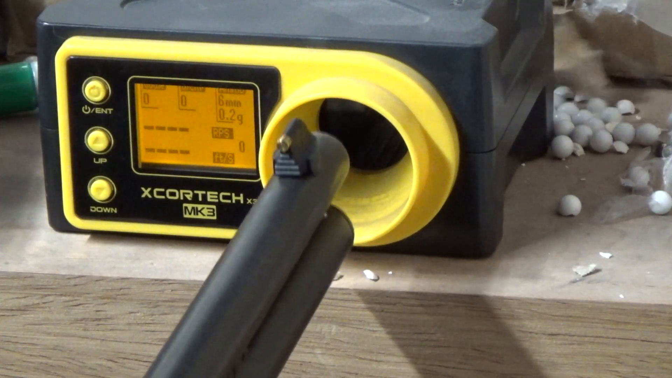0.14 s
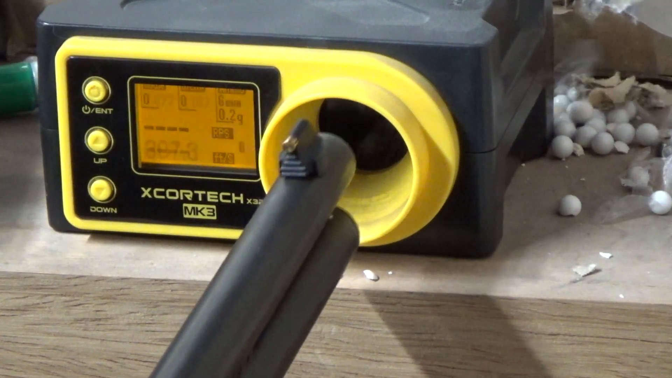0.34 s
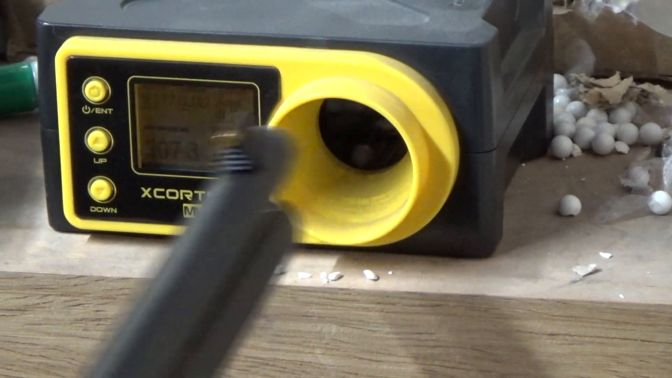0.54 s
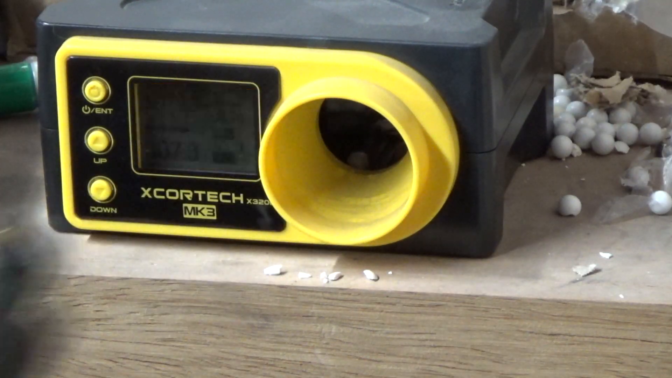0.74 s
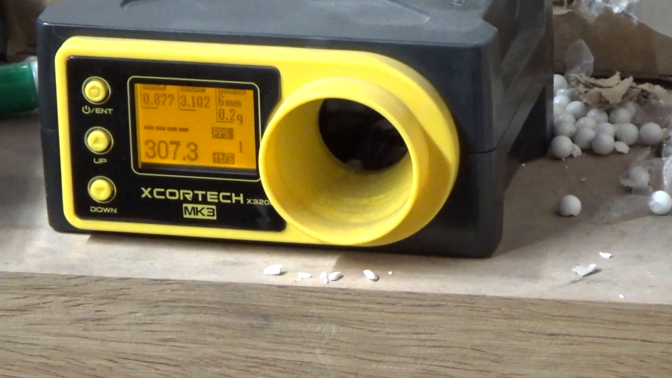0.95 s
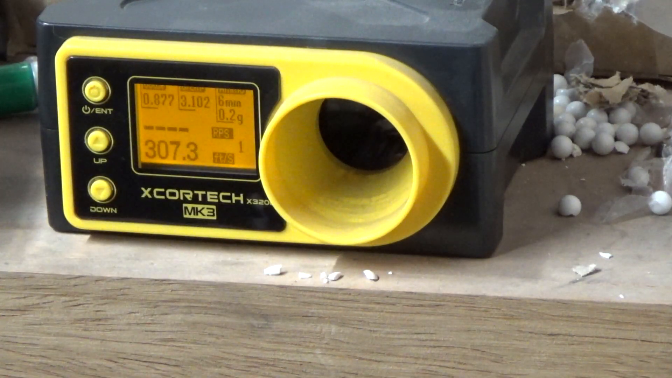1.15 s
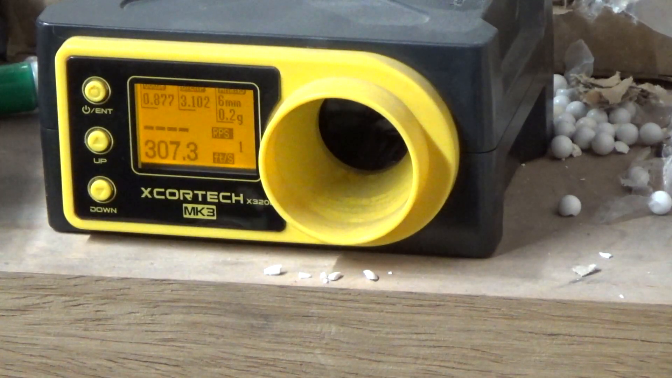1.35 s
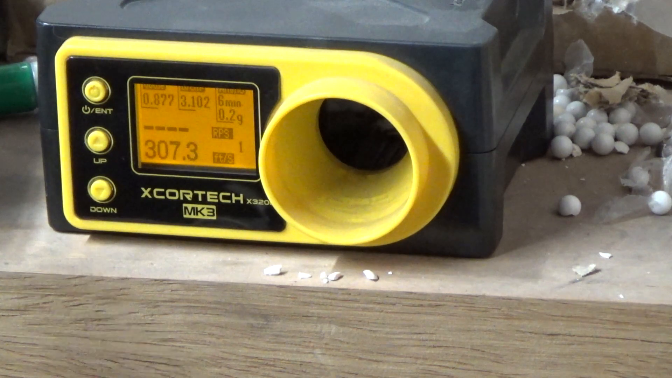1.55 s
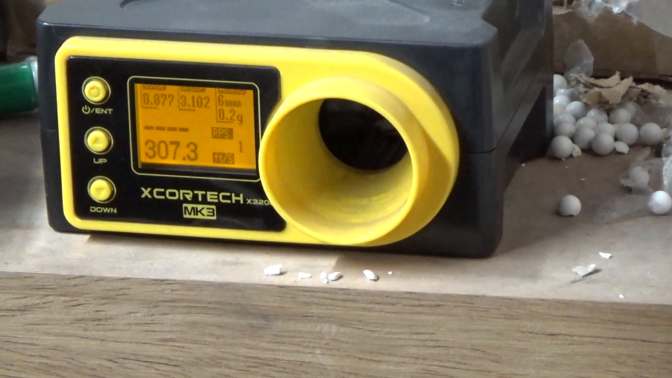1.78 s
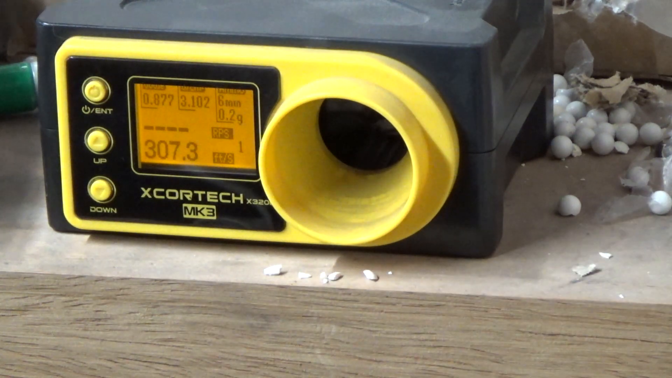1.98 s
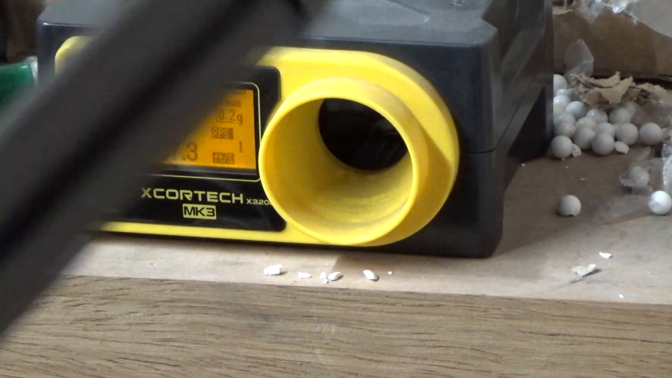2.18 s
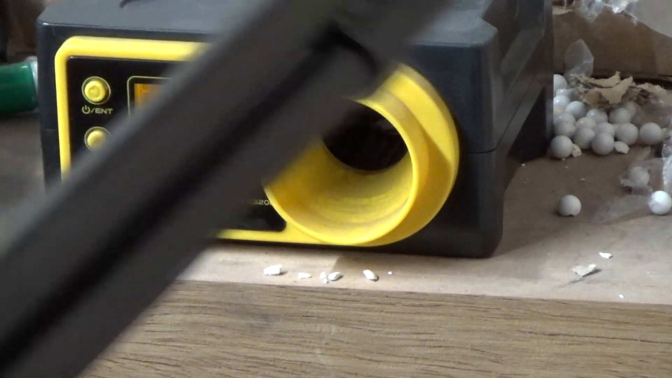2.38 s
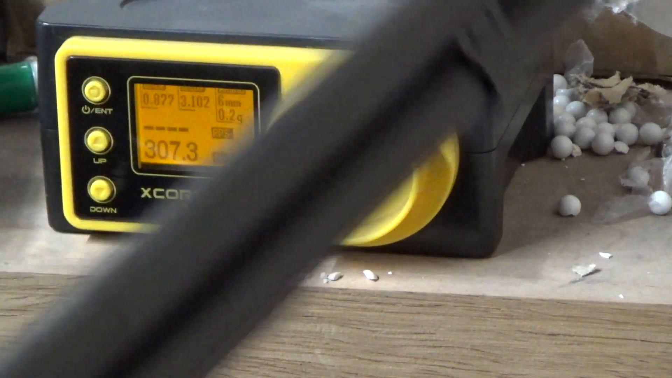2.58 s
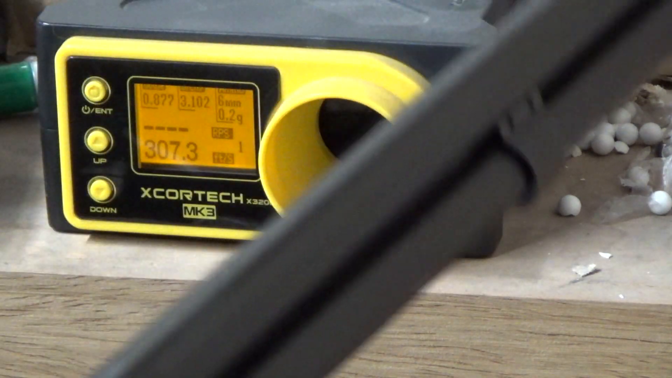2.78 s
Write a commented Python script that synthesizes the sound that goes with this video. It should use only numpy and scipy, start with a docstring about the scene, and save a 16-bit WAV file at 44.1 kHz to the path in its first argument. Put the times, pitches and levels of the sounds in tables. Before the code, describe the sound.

Close recording in a small hard room: one snappy air rifle shot, bright pellet bounces fading into ticks, near silence, then a crisp latch snap and a heavier scraping clatter of the steel lever action.

```python
"""An air rifle fires one plastic pellet into a short tube on a bench: dying bursts of noise over bench modes.
The pellet rattles to rest in a small hard room as ringing bounces and faint random ticks.
Then a hand works the lever: steel parts click as damped modes, slide as grainy noise and knock the stock;
a latch snaps and a spring sings in narrow bands of noise. A limiter holds down the loud peaks."""
import sys
import numpy as np
from scipy import signal
from scipy.fft import rfft, irfft, next_fast_len
from scipy.io import wavfile
from scipy.ndimage import uniform_filter1d, minimum_filter1d

SR = 44100
rng = np.random.default_rng(int(sys.argv[2]) if len(sys.argv) > 2 else 0)


def to_wav(sig):
    """Store sig (one row per channel, or 1-D mono) as 16-bit WAV at the path in sys.argv[1].

    Samples outside -1..1 are clipped; the rate is SR.
    """
    pcm = np.clip(np.atleast_2d(sig), -1, 1) * 32767
    pcm = np.round(pcm).astype(np.int16)
    wavfile.write(sys.argv[1], SR, pcm.T)  # frames by channels


def nominal_scale(level):
    """Amplitude ratio for a level in decibels (scalar or array-like)."""
    x = np.asarray(level, float) / 20
    return 10 ** x


N = 125685  # samples

# colours of rubbing or cracking noise, and of a tap on the tube: frequency_hz, relative_level_db
BRIGHT_COLOUR = [(4500, -36), (7000, -17), (9000, 2), (11500, 2.5), (14000, -9.5), (16000, -22.5)]
MIDDLE_COLOUR = [(1200, -29), (2300, -4), (4500, -1), (5600, -5.5), (6500, -13), (8000, -6), (10000, -17.5)]
TUBE_TAP_COLOUR = [(500, -36), (1300, -5.5), (2300, -4.5), (5500, 3.5), (6400, -1.5), (8000, -2),
                   (12000, -7)]
# level of the room tail for each kind of source
CLICK_ROOM_DB, PELLET_ROOM_DB, RUB_ROOM_DB = -5, -6.5, -6


def along(points, hz):
    """Interpolation of (frequency, value) points on a logarithmic frequency axis."""
    f, v = np.transpose(points)
    return np.interp(np.log(hz + 1), np.log(f + 1), v)


def unit(x):
    """Normalization to a root-mean-square of 1."""
    return x / np.sqrt(np.mean(x ** 2) + 1e-20)


def filtered(x, response):
    """Linear filtering: the spectrum is multiplied by a response of frequency."""
    m = next_fast_len(x.shape[-1] + 4096)
    spectrum = rfft(x, m) * response(np.fft.rfftfreq(m, 1 / SR))
    return irfft(spectrum, m)[..., :x.shape[-1]]


def thin(x):
    """Weak radiation of bass by small parts, as a causal high-pass filter."""
    return signal.sosfilt(signal.butter(3, 300, "high", fs=SR, output="sos"), x)


def spread(pair, alike):
    """Interchannel coherence: two unrelated signals are mixed to a likeness set by frequency."""
    def mid_side_gains(hz):
        angle = np.arccos(np.clip(along(alike, hz), 0, 1)) / 2
        return np.array([np.cos(angle), np.sin(angle)])

    mid, side = filtered(pair, mid_side_gains)
    return np.array([mid + side, mid - side])


def in_room(x, wet_db, pan_db=0):
    """Reverberation: direct sound plus a fresh diffuse tail whose frequencies decay at their own rates."""
    # reverberation time: frequency_hz, t60_s
    decay = [(60, 0.53), (250, 0.36), (800, 0.29), (3000, 0.29), (8000, 0.21), (15000, 0.17)]
    # left-right likeness of the tail: frequency_hz, likeness (0 to 1)
    likeness = [(200, 1), (1000, 0.83), (4000, 0.74), (8000, 0.78), (12000, 0.99)]
    onset_s = 0.0011
    hz, t, z = signal.stft(rng.standard_normal((2, SR // 2)), SR, nperseg=256)
    fade = nominal_scale(-60 * t / along(decay, hz)[:, None])
    tail = signal.istft(z * fade, SR, nperseg=256)[1]
    tail = spread(tail / np.linalg.norm(tail[0]), likeness)
    tail = tail * (1 - np.exp(-np.arange(tail.shape[1]) / SR / onset_s))
    out = nominal_scale(wet_db) * signal.fftconvolve(x[None], tail, axes=1)
    # a positive pan makes the direct sound louder on the left
    out[:, :len(x)] += x * nominal_scale(np.array([[pan_db / 2], [-pan_db / 2]]))
    return out


def add(out, s, x):
    """Superposition: x is mixed in from time s (seconds)."""
    part = out[:, round(s * SR):][:, :x.shape[1]]
    part += x[:, :part.shape[1]]


def ring(modes, t):
    """Modal decay: damped sines, each blow scattering their levels by 2 dB and pitches by 2 %."""
    total = 0
    for hz, db, t60 in modes:
        envelope = nominal_scale(db + rng.normal(0, 2) - 60 * t / t60)
        total = total + envelope * np.sin(2 * np.pi * hz * rng.normal(1, .02) * t)
    return total * (1 - np.exp(-t / 0.00056))  # soft onset


def crack(t, t60, tone):
    """Impulsive noise: an exponentially dying burst through a causal minimum-phase colour."""
    m = 4096
    # folding the cepstrum turns the log magnitude into a minimum-phase response
    ceps = irfft(along(tone, np.fft.rfftfreq(m, 1 / SR)) * np.log(10) / 20, m)
    ceps[1:m // 2] *= 2
    ceps[m // 2 + 1:] = 0
    colour = irfft(np.exp(rfft(ceps)), m)
    burst = rng.standard_normal(len(t)) * nominal_scale(-60 * t / t60)
    x = signal.fftconvolve(burst, colour)[:len(t)]
    return x / np.sqrt(uniform_filter1d(x ** 2, size=44).max()) / 2  # loudest millisecond has rms 0.5


def hush():
    """Stationary noise: coloured room tone with a faint raised band and frequency-dependent coherence."""
    # room tone: frequency_hz, relative_level_db
    colour = [(15, -26), (25, -8), (114, -3), (149, -3.5), (249, -2), (373, -3.5), (405, -3.5), (545, -3.5),
              (624, -6), (887, -1.5), (1520, -7.5), (1890, -8), (16000, -20)]
    # left-right likeness: frequency_hz, likeness (0 to 1)
    likeness = [(60, 1), (180, 0.85), (550, 0.31), (1650, 0.14), (4970, 0.66), (15000, 1)]
    # the raised band: centre_hz, width_hz, boost_db
    band_hz, width_hz, boost_db = (934, 43, 5.1)

    def response(hz):
        band = boost_db * np.exp(-((hz - band_hz) / width_hz) ** 2)
        return nominal_scale(along(colour, hz) + band)

    noise = filtered(rng.standard_normal((2, N)), response)
    return nominal_scale(-57) * unit(spread(noise, likeness))


def clicks(out):
    """Impact excitation: steel on steel rings short modes and cracks in two colours, and knocks the stock."""
    # trigger, lever and action: start_s, level_db, bright_steel_db, stock_knock_db, knock_hz
    contacts = [(0.1513, -28.5, -6, -3, 1560), (1.169, -45, -5, -7, 1480), (1.259, -51, 7, -12, 1500),
                (1.311, -51.5, 4, -6, 1500), (1.706, -26, 8, -10, 1330), (1.7163, -40.5, 13, -7, 1360),
                (1.7337, -38, -12, 5, 960), (1.946, -47, -14, -2, 1500), (2.0017, -37.5, -5, -14, 1700),
                (2.1727, -48, 3.5, -16, 1700), (2.4228, -21.5, 5, -11, 2860), (2.4284, -30, 1, -9, 1330),
                (2.4482, -13.5, -15, -19, 1820), (2.4532, -20, 3, 4, 1614), (2.4681, -36, -6, 8, 1590),
                (2.4754, -37, -15, -6, 1680), (2.5201, -23, -12, -3, 1740),
                (2.5398, -19.5, -15.5, -0.5, 1436), (2.5652, -29, -1, 5, 1950),
                (2.5663, -16.5, 6.5, -1.5, 2290), (2.5721, -28, 18.5, -7, 1900),
                (2.6025, -40, 14, -14, 1900)]
    # lower and bright modes of the steel: pitch_hz, level_db, t60_s
    steel_modes = [(2640, -14, .012), (3850, -4, .01), (4700, -5, .007), (5570, 0, .01), (6400, -5, .007),
                   (7050, -2, .01)]
    bright_modes = [(8700, -3, .006), (9700, -2, .006), (10700, -1, .007), (11800, -2, .006),
                    (12800, -2, .006), (13700, -5, .005)]
    steel_db, crack_db, crack_t60_s = -4, -4.5, 0.012
    knock_t60_s, partner_ratio = 0.012, 1.123  # the knock has a second, higher line
    t = np.arange(SR // 10) / SR

    def steel(modes, colour):
        return nominal_scale(steel_db) * ring(modes, t) + nominal_scale(crack_db) * crack(t, crack_t60_s, colour)

    for s, db, bright_db, stock_db, knock_hz in contacts:
        knock_modes = [(knock_hz, 0, knock_t60_s), (knock_hz * partner_ratio, -3, knock_t60_s)]
        x = steel(steel_modes, MIDDLE_COLOUR)
        x = x + nominal_scale(bright_db) * steel(bright_modes, BRIGHT_COLOUR)
        x = x + nominal_scale(stock_db) * ring(knock_modes, t)
        add(out, s, in_room(nominal_scale(db) * thin(x), CLICK_ROOM_DB, 2.6))


def shot(out):
    """Sudden gas release: bursts of air noise with much reverberation, over the modal thump of the bench."""
    # muzzle blast and its first returns from tube and bench: start_s, level_db
    bursts = [(0.1595, 6.5), (0.1627, 9), (0.1673, 8.5), (0.1737, -2), (0.1762, 0.5), (.182, 7)]
    # colour of the air bursts: frequency_hz, relative_level_db
    colour = [(40, -36), (80, -19), (180, -19.5), (312, -12), (455, -9.5), (800, 3.5), (1400, -4),
              (2000, -4), (2840, 2), (3700, -2.5), (5310, 6), (6450, -5), (7100, -1), (9940, 7),
              (11500, 4.5), (13100, -1), (16000, -13.5)]
    # bench modes: pitch_hz, level_db, t60_s
    bench_modes = [(169, -10.5, .05), (383, 2, 0.033), (820, -0.5, 0.021)]
    burst_t60_s, burst_room_db, thump_db = 0.0042, 6.5, -13.5
    t = np.arange(SR // 10) / SR
    thump = nominal_scale(thump_db) * ring(bench_modes, t)
    add(out, bursts[0][0], in_room(thump, CLICK_ROOM_DB))
    for s, db in bursts:
        add(out, s, in_room(nominal_scale(db) * crack(t, burst_t60_s, colour), burst_room_db))


def pellet(out):
    """Repeated impact: every bounce rings the modes of the pellet and taps the tube."""
    # bounces: start_s, level_db, upper_ring_db, tube_db
    bounces = [(0.282, -7, -5, -19), (0.2994, -3.5, 8, -10), (0.317, -11, 8.5, -21), (0.32, -21, 12.5, -7),
               (0.3244, -13, -12, -19), (0.331, -29, 6, -14), (0.348, -14.5, 5, -4.5),
               (0.353, -10, -10, -10.5), (0.3869, -8, 3, -15.5), (0.3896, -10, -5.5, -14.5),
               (0.3942, -13.5, -0.5, -10), (0.4161, -19.5, -9, -5.5), (0.4304, -14, 6, -8),
               (0.4451, -10.5, -22, -12), (0.4641, -14, -12, -11.5), (0.481, -30, -12.5, -3),
               (0.4854, -15.5, -16, -11.5), (0.514, -40, -6, 3), (0.5266, -38, -8, 0.5),
               (0.543, -53, -7, -14)]
    # main and upper pellet modes, then tube modes: pitch_hz, level_db, t60_s
    main_modes = [(9450, -1, .005), (9900, 0, .005), (10400, -2, .004)]
    upper_modes = [(11250, 0, .006), (12000, -2, .004), (13000, -4, .004), (7900, -8, .004)]
    tube_modes = [(2350, -3, .007), (3700, -4, .004), (4500, -2, .005), (5400, -3, .004)]
    crack_db, tap_db = -9, 4.5
    t = np.arange(SR // 20) / SR
    for s, db, upper_db, tube_db in bounces:
        tube = ring(tube_modes, t) + nominal_scale(tap_db) * crack(t, 0.014, TUBE_TAP_COLOUR)
        x = 1.3 * ring(main_modes, t) + nominal_scale(upper_db) * ring(upper_modes, t) + nominal_scale(tube_db) * tube
        x = x + nominal_scale(crack_db) * crack(t, 0.004, BRIGHT_COLOUR)
        add(out, s, in_room(nominal_scale(db) * x, PELLET_ROOM_DB))


def skitter(out):
    """Random micro-impacts: the pellet skitters between bounces as fading ticks at random moments."""
    span_s, level_db, scatter_db = (0.33, 0.49), (-22.5, -42.5), 1  # first two: at start and end
    t = np.arange(SR // 50) / SR
    for place, luck, colour in rng.random(size=(60, 3)):
        db = np.interp(place, (0, 1), level_db) + scatter_db * (2 * luck - 1)
        tick = crack(t, 0.0029, TUBE_TAP_COLOUR if colour < .7 else BRIGHT_COLOUR)
        add(out, np.interp(place, (0, 1), span_s), in_room(nominal_scale(db) * tick, PELLET_ROOM_DB))


def slides(out):
    """Sliding friction: noise in four colours, each with a random grain and its own moving level."""
    # strokes of sliding parts: time_s, then relative levels deep_db, hollow_db, middle_db, bright_db
    strokes = [
        [(1.48, -81, -78, -65, -67), (1.506, -73, -79, -71, -73), (1.562, -85, -76, -67, -62),
         (1.602, -58, -61, -62, -61.5), (1.636, -58, -67, -60, -60), (1.668, -78, -58, -58, -55),
         (1.692, -54, -42.5, -41, -51), (1.726, -59, -42, -42.5, -53), (1.784, -76, -81, -82, -78),
         (1.79, -67, -60, -60, -66)],
        [(1.84, -63, -53, -60, -61), (1.872, -45.5, -63, -64, -72), (1.892, -71, -59, -56, -56),
         (1.902, -80, -68, -55, -54), (1.914, -74, -65, -56, -66), (1.93, -70, -51, -55, -51)],
        [(2.418, -42, -51, -55, -62), (2.424, -55.5, -36, -53, -62), (2.438, -33, -42, -46, -65),
         (2.452, -50, -33.5, -28, -65), (2.5, -50, -53.5, -44, -55), (2.546, -40, -42.5, -30, -40),
         (2.558, -55, -49, -47, -60), (2.566, -60, -37, -36.5, -57), (2.596, -36, -44, -33.5, -48),
         (2.66, -79, -69, -62, -49.5)],
    ]
    # the two lower colours: frequency_hz, relative_level_db
    deep_colour = [(250, -30), (420, -10), (540, -1), (640, 0.5), (750, 0), (1000, -17.5)]
    hollow_colour = [(600, -26.5), (800, -9), (950, -3.5), (1130, -4), (1370, 2.5), (1550, -11),
                     (1750, -9.5), (2300, -5), (3200, -39)]
    grain_db, trim_db = 1.5, -3.5  # rms swing of the grain; gain of every rub
    for rows in strokes:
        s, *levels = np.transpose(rows)
        t = np.arange(s[0], s[-1], 1 / SR)
        x = 0
        for level_db, colour in zip(levels, (deep_colour, hollow_colour, MIDDLE_COLOUR, BRIGHT_COLOUR)):
            swing = unit(uniform_filter1d(rng.standard_normal(len(t)), size=60))
            grain = nominal_scale(grain_db * swing)
            rub = filtered(grain * rng.standard_normal(len(t)), lambda hz: nominal_scale(along(colour, hz)))
            x = x + unit(rub) * nominal_scale(np.interp(t, s, level_db) + trim_db)
        add(out, s[0], in_room(x, RUB_ROOM_DB, 1.0))


def thuds(out):
    """Damped resonance: the wooden stock answers with one soft, short low mode."""
    # thuds: start_s, level_db, pitch_hz
    blows = [(1.688, -46, 1365), (1.731, -37, 953), (1.862, -51, 754), (2.425, -36, 520),
             (2.447, -29.5, 507), (2.454, -27.5, 500), (2.5405, -31, 620), (2.5665, -35.5, 618),
             (2.586, -42, 602)]
    t60_s, room_db = 0.053, -9.5
    t = np.arange(SR // 10) / SR
    for s, db, hz in blows:
        add(out, s, in_room(thin(ring([(hz, db, t60_s)], t)), room_db))


def latch(out):
    """Contact rebound: the latch snaps shut in a few quick noise bursts, each with a brief modal ring."""
    # the snap and its rebounds: start_s, level_db, t60_s
    contacts = [(1.7934, -9.5, 0.0056), (1.7945, -10.5, 0.0059), (1.7963, -15.5, 0.012),
                (1.8015, -19, .008), (1.8056, -17.5, 0.0089)]
    # colour of the snap: frequency_hz, relative_level_db
    colour = [(500, -32), (1300, -24.5), (2390, -13.5), (3000, -16), (3900, -8), (5550, 0), (7100, 2),
              (7750, -7), (9220, -7), (10500, -10.5), (13100, -4), (14500, -22), (16000, -29)]
    # modes of the latch: pitch_hz, level_db, t60_s
    latch_modes = [(2400, -9, .02), (3900, -5, .014), (5560, 0, .012), (7050, -6, .012), (9150, -9, .012)]
    ring_db, room_db = -9.5, -8
    t = np.arange(SR // 10) / SR
    for s, db, t60 in contacts:
        x = crack(t, t60, colour) + nominal_scale(ring_db) * ring(latch_modes, t)
        add(out, s, in_room(nominal_scale(db) * x, room_db))


def spring(out):
    """Narrow-band resonance: the spring sings in fuzzy treble lines while the lever swings home."""
    # moving levels of the two groups of lines, one singing early and one later: time_s, early_db, late_db
    course = [(2.424, -58, -70), (2.43, -42, -61), (2.5, -48, -55), (2.53, -57, -40), (2.542, -58, -36.5),
              (2.562, -61, -37), (2.566, -70, -70)]
    # lines of each group: centre_hz, half_width_hz, relative_level_db
    early_lines = [(11400, 250, 2), (13400, 350, -1)]
    late_lines = [(9140, 200, -9), (12500, 160, 5), (13900, 330, -2)]
    s, *levels = np.transpose(course)
    t = np.arange(s[0], s[-1], 1 / SR)
    x = 0
    for level_db, lines in zip(levels, (early_lines, late_lines)):
        def response(f):
            return sum(nominal_scale(db) / (1 + ((f - hz) / width) ** 2) for hz, width, db in lines)

        noise = filtered(rng.standard_normal(len(t)), response)
        x = x + unit(noise) * nominal_scale(np.interp(t, s, level_db))
    add(out, s[0], in_room(x, RUB_ROOM_DB - 14))


def scene():
    """Superposition of all sources on the room tone."""
    out = hush()
    for source in (clicks, shot, pellet, skitter, slides, thuds, latch, spring):
        source(out)
    return out


def low_pass(x):
    """Removes everything above the highest recorded frequency."""
    return signal.sosfilt(signal.butter(12, 16970, fs=SR, output="sos"), x)


def record(dry):
    """Peak limiting: one gain for both channels dips around loud peaks; then a band limit."""
    limit_db, hold_s, glide_s, top_hz = -7.5, 0.0051, 0.0075, 16000
    need = np.minimum(1, nominal_scale(limit_db) / (np.abs(dry).max(axis=0) + 1e-9))
    held = minimum_filter1d(need, max(int(hold_s * SR), 3))
    gain = uniform_filter1d(held, max(int(glide_s * SR), 3))
    mix = filtered(dry * gain, lambda hz: hz < top_hz)
    return low_pass(mix)


dry = scene()
out = record(dry)
to_wav(out)
```